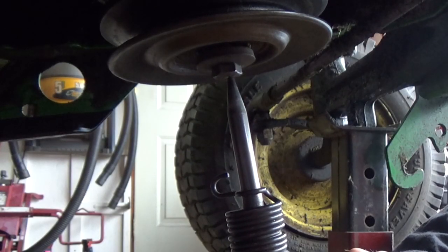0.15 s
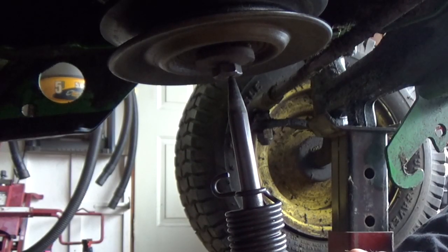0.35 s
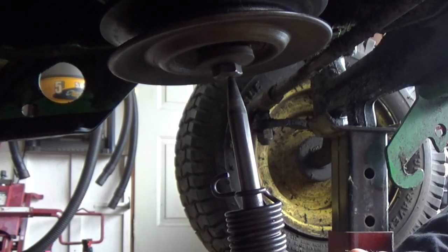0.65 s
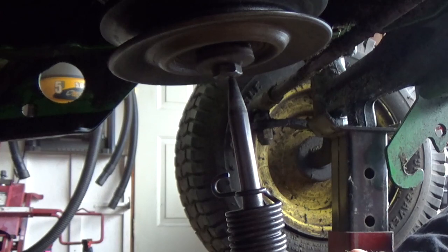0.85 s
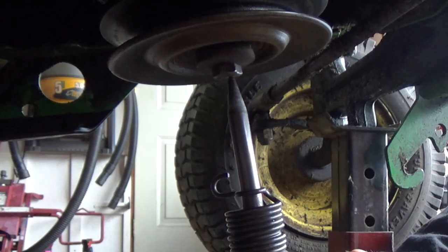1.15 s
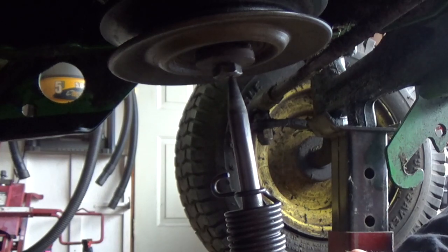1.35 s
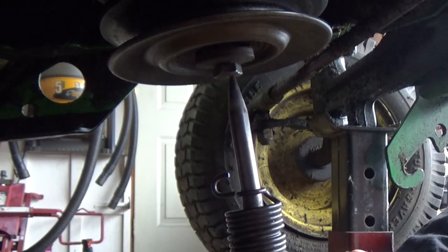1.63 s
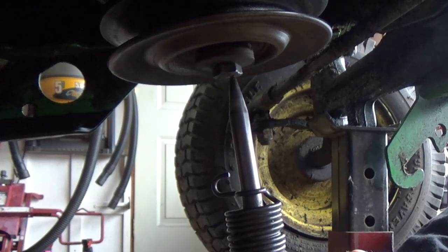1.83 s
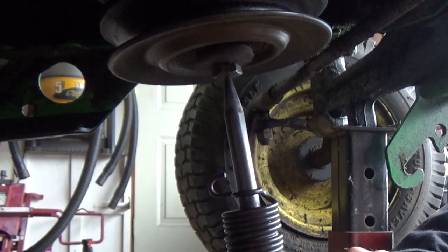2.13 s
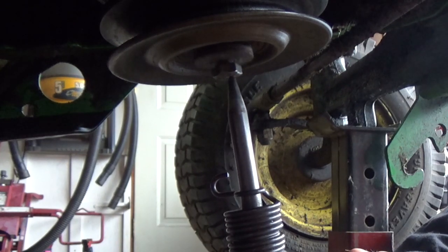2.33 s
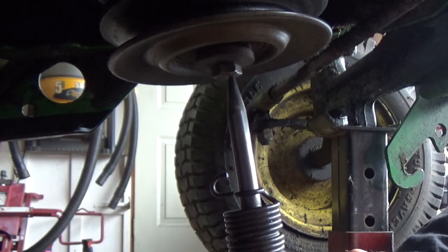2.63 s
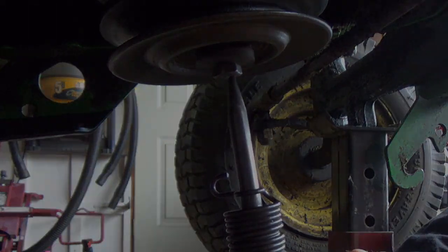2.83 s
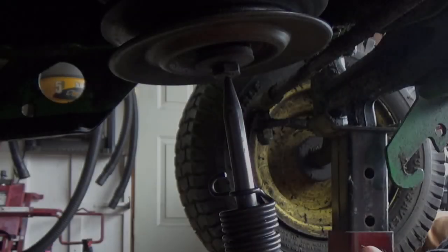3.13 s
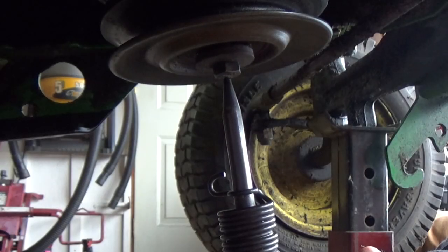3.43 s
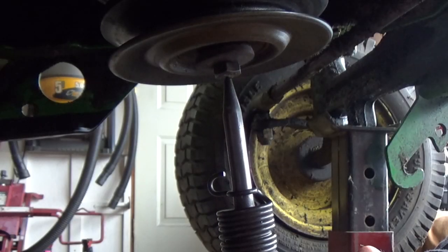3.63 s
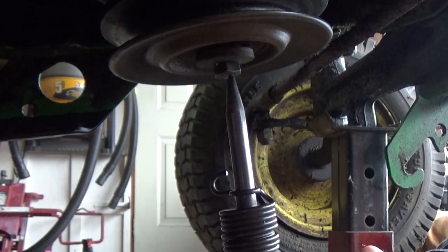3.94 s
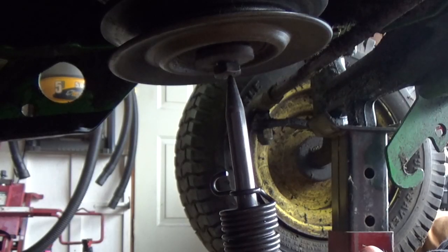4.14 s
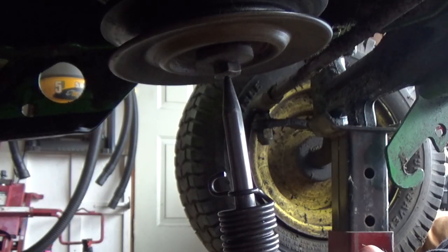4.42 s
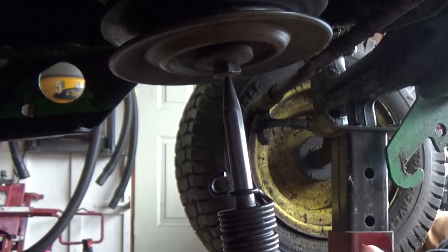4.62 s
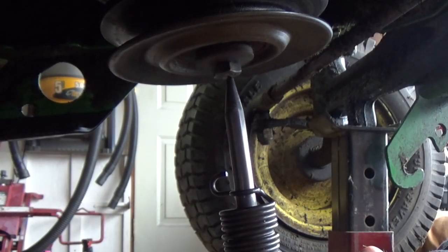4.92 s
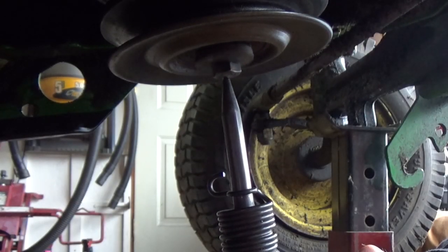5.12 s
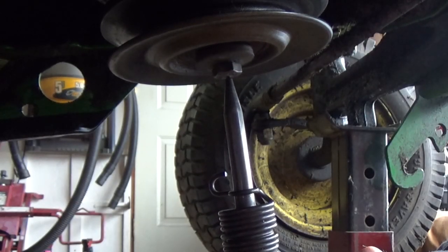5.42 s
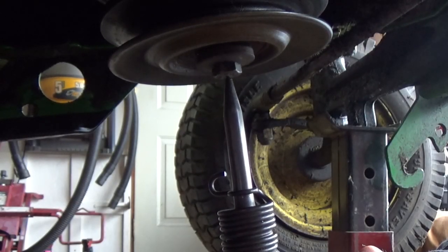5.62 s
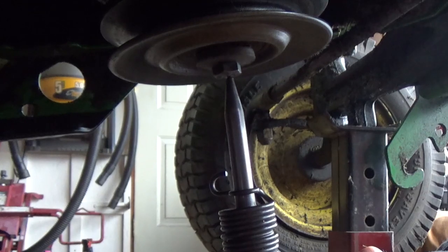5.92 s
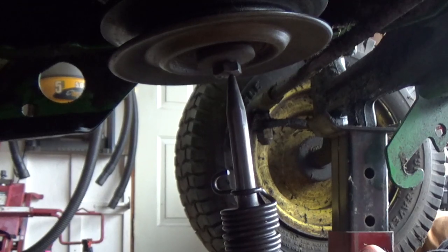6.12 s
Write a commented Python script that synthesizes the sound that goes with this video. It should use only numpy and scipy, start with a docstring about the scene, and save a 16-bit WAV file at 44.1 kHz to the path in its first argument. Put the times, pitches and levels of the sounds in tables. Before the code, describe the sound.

A pneumatic hammer runs without pause, heard close up under a machine. Its blows come about forty to fifty a second, each a hard tick and crack with ringing bit and clanging pulley, over puffing, hissing air. Halfway it drops to just over thirty blows a second with heavier exhaust thumps and less high ringing, then slowly quickens. The workshop adds a short, dense reverberation.

```python
"""Air hammer on a seized clutch

In a workshop, close by, a pneumatic hammer drives its punch bit against the bolt of a seized clutch.
The piston strikes about 25-58 times a second: each blow cracks and rings the bit and the clutch.
Each stroke vents puffs of air that boom, buzz and hiss; the workshop answers with a short reverberation.
Halfway through, the bit takes a new seat and the hammer runs slower, with a heavier exhaust.
"""
import sys
import numpy as np
from scipy import signal
from scipy.fft import rfft, irfft
from scipy.io import wavfile
from scipy.ndimage import uniform_filter1d

SR = 44100
rng = np.random.default_rng(int(sys.argv[2]) if len(sys.argv) > 2 else 0)


def transcribe(u):
    """Save the signal u as a 16-bit wav file named by the first command-line argument.

    u: samples, shape (n,) or (channels, n), limited to [-1, 1]; the rate is SR.
    q: integer samples, one column per channel.
    """
    v = np.clip(np.atleast_2d(u).T, -1, 1)
    q = np.round(v * 32767).astype(np.int16)
    wavfile.write(sys.argv[1], SR, q)


N = 276330
TIME = np.arange(N) / SR
RESEAT_S = 3.04
CUTOFF_HZ = 15850

# Levels within a mode, order or spectrum table are relative to one another.
# piston speed in the first seat: (time [s], rate [blows/s])
FIRST_SPEED = [(0.0, 39.39), (0.1, 57.98), (0.199, 34.12), (0.299, 25.7), (0.399, 38.47), (0.498, 43.71),
               (0.748, 37.37), (0.797, 43.9), (0.847, 40.84), (0.947, 47.24), (1.146, 38.87),
               (1.196, 48.99), (1.246, 41.02), (1.346, 45.0), (1.495, 45.9), (1.545, 43.53), (1.595, 47.97),
               (1.744, 40.08), (1.794, 45.78), (2.143, 46.36), (2.193, 42.46), (2.342, 39.99),
               (2.392, 51.41), (2.691, 52.38), (2.791, 47.03), (2.841, 52.61), (2.89, 46.79), (3.04, 55.09)]
# piston speed in the second seat: (time [s], rate [blows/s])
SECOND_SPEED = [(3.04, 32.36), (3.411, 31.1), (3.57, 33.13), (3.781, 32.26), (4.523, 35.21), (4.576, 34.71),
                (4.946, 37.03), (4.999, 33.77), (5.211, 38.7), (5.317, 34.23), (5.37, 42.39),
                (5.582, 36.65), (5.635, 41.94), (5.74, 38.66), (5.899, 40.6), (6.111, 40.55), (6.27, 43.92)]
# each seat starts on a full air line: (piston position [turns], blows [dB], clutch [dB], exhaust [dB],
# sag of the air [dB], time constant of the sag [s], return puff after the blow [turns], hiss over boom [dB])
SEAT_SETTINGS = [(0.448, -25, -33, -33, 5, 0.68, 0.58, 3), (0.175, -27, -33, -28, 14, 2.55, 0.515, 3)]
# how hard the bit is pushed on the bolt, for rattle and hiss: (time [s], level [dB])
PUSH_CURVE = [(0, -1), (.17, 1), (.22, 0.5), (.28, -11), (.35, -13), (.41, -1.5), (3, -2), (3.06, 0),
              (4.2, -0.5), (6.27, -2.5)]
# the operator leans on the hammer (+) or eases off (-): (time [s], half length [s], level at the clutch [dB])
OPERATOR_LEANS = [(0.055, 0.12, 1.7), (0.277, 0.11, -2.5), (1.478, 0.037, 1), (2.058, 0.21, 1.5),
                  (2.26, 0.09, -3), (2.98, 0.21, 1), (4.346, 0.062, 1), (4.733, 0.2, -2.0),
                  (5.24, 0.15, 0.7), (5.73, 0.022, -3)]
# shares of the air's sag, and of the operator's lean, that each level follows
BLOW_SAG_SHARE, CLUTCH_SAG_SHARE = 0.014, 0.21
BLOW_LEAN_SHARE, AIR_LEAN_SHARE = 0.95, 0.47
# blows that bite harder (+) or skid (-): (time [s], level [dB])
ACCENTED_BLOWS = [(0.013, -1.5), (0.202, -2.8), (1.017, 2), (1.184, 2.5), (1.364, -2), (1.476, 1.5),
                  (2.074, 0.5), (2.395, 4), (2.882, 1.5), (3.252, -7), (3.569, -2), (3.751, -4),
                  (3.781, 0.5), (3.965, 1.7), (4.322, -2), (4.751, 2), (5.504, 2.5), (6.156, -1)]
# crack of steel on steel: (frequency [Hz], level [dB per Hz])
CRACK_SPECTRUM = [(1500, -11), (3300, 3.5), (5000, 4.5), (6800, 11.5), (8500, 11), (11000, 15),
                  (12800, -5.5), (14500, 5.5), (15700, 3)]
# steel bit and bolt: (frequency [Hz], width [Hz], level in first seat [dB], level in second seat [dB])
BIT_MODES = [(5254, 110, -41.5, -41.5), (5740, 400, -38, -49), (5750, 50, -49, -46.5),
             (6320, 74, -44.5, -46), (6430, 120, -68, -46), (6660, 88, -45.5, -51), (6920, 96, -37.5, -38),
             (7430, 200, -44, -44), (7780, 50, -43.5, -39), (9070, 200, -38.5, -55),
             (9640, 130, -34.5, -46), (10045, 300, -37, -45), (10630, 55, -57, -45),
             (11170, 55, -37, -38.5), (11590, 210, -38.5, -38), (12730, 810, -39, -38),
             (14400, 400, -47, -47)]
# tick of the very first contact: (frequency [Hz], level [dB per Hz])
TICK_SPECTRUM = [(1000, -23), (2500, -10), (5500, -4), (8500, 0), (12000, -1.5), (14200, 0), (15700, 0)]
# the bit's long high ring, split into three close modes:
# (frequency [Hz], width [Hz], level in first seat [dB], level in second seat [dB])
HIGH_RING_MODES = [(10010, 43, -0.5, -5), (10110, 59, -4, 2), (10170, 33, 10, 1)]
# blows that land squarely and make the high ring flare: (time [s], ring level before its trim [dB])
SQUARE_HITS = [(0.036, -29.4), (0.077, -30.8), (0.094, -28), (0.517, -26.3), (0.588, -29.6), (0.714, -31),
               (0.789, -29.5), (0.837, -31.0), (1.342, -29.6), (1.364, -28), (1.387, -29), (1.409, -31),
               (1.565, -30.6), (1.649, -29.5), (1.673, -33), (1.719, -31), (1.768, -28), (1.943, -34),
               (2.03, -30), (2.118, -28), (2.137, -36), (2.374, -33), (2.435, -30), (2.492, -31),
               (2.549, -30.5), (2.589, -30), (2.665, -31.5), (2.685, -32), (2.804, -30.4), (2.882, -30),
               (2.985, -31.0), (3.005, -36), (3.023, -32), (3.599, -35), (3.72, -36), (3.781, -35),
               (3.874, -32), (3.904, -36), (4.147, -36), (4.941, -33), (5.166, -32), (5.22, -37),
               (5.732, -31.5), (5.76, -35), (5.785, -35), (5.933, -33), (6.057, -37)]
# clutch pulley and chassis: (frequency [Hz], width [Hz], level in first seat [dB], level in second seat [dB])
CLUTCH_MODES = [(495.4, 65, -47.5, -47), (628, 33, -44.5, -48.5), (649.2, 34, -46, -48.5),
                (779, 52, -48, -47), (896, 160, -49, -47.5), (1039.7, 16.5, -46.5, -44),
                (1198, 37, -43.5, -46.5), (1404, 63, -42.5, -42), (1511, 73, -47, -44),
                (1870, 42, -53, -52), (1855, 120, -46, -43), (2110, 196, -40.5, -39),
                (2292, 88, -50, -42.5), (2507, 100, -85, -46), (2630, 53, -49, -46), (2710, 170, -47, -39),
                (2850, 78, -46, -72), (3086, 180, -44, -75), (3208, 47, -51, -42), (3330, 170, -47.5, -37),
                (3450, 360, -42.5, -36), (3712, 81, -44, -47), (3840, 140, -40.5, -47),
                (3906, 33, -55, -45), (4145, 66, -47, -52.5), (4430, 74, -42.5, -43),
                (4527, 63, -43, -42.5), (4800, 240, -55, -47)]
# one band of the metal's sound grows louder (+) or softer (-) for a while:
# (time [s], half length [s], frequency [Hz], width [Hz], level [dB])
BAND_CHANGES = [(0.32, 0.09, 1500, 300, 5.5), (0.33, 0.055, 7200, 400, 6), (0.33, 0.055, 11500, 600, 3),
                (0.303, 0.083, 2780, 900, -8), (1.15, 0.24, 6300, 400, 4.5), (1.468, 0.032, 3280, 700, 5),
                (1.95, 0.46, 3640, 300, 4), (2.1, 0.95, 784, 100, 3.5), (2.82, 0.4, 2020, 700, 4),
                (3.3, 0.16, 560, 250, 6), (3.35, 0.21, 3250, 300, 4.5), (3.55, 0.23, 11200, 450, 6.5),
                (3.85, 0.32, 7200, 600, 4), (4.1, 0.34, 1520, 90, 7), (4.384, 0.051, 3250, 700, 5),
                (4.65, 0.23, 10700, 180, 9), (5.048, 0.54, 820, 110, 7.5), (5.214, 0.18, 2860, 800, 3),
                (5.3, 0.24, 6630, 400, 6.5), (1.45, 0.65, 14200, 700, 1), (5.7, 0.5, 11300, 300, 1),
                (5.85, 0.9, 1030, 80, -3), (6.1, 0.6, 647, 50, 10.5)]
# boom of the hollow under the chassis: (frequency [Hz], level [dB per Hz])
HOLLOW_SPECTRUM = [(25, -32), (62, -24), (100, -5.5), (128, -0.5), (150, -3), (175, 1), (205, 4),
                   (232, 5.5), (255, 9.5), (285, 4), (320, 9), (360, -2.5), (420, -20.5), (540, -17),
                   (1000, -19.5), (4000, -52)]
# chuff of a heavy return puff: (frequency [Hz], level [dB per Hz])
CHUFF_SPECTRUM = [(30, -22.5), (80, -9.5), (160, -7.5), (250, -4.5), (325, -1.5), (420, -12.5), (520, -4.5),
                  (575, -4), (640, -5), (720, -14), (1100, -19), (3000, -35)]
# buzz of the exhaust port: (multiple of the blow rate, level in first seat [dB], level in second seat [dB])
PORT_ORDERS = [(2, 3, 3), (3, 2, -3), (4, 3.5, 6), (5, -2.5, -4), (6, -1, 3), (7, -0.5, -4), (8, -5, -0.5),
               (9, -4, 0.5), (10, -1.5, -2), (11, 0, -3)]
# rush of the exhaust air: (frequency [Hz], level [dB per Hz])
RUSH_SPECTRUM = [(25, -20), (60, -19), (130, -14), (330, 5), (430, -14.5), (540, -6), (900, -0.5),
                 (1700, -3), (2200, -4.5), (3300, -4), (4700, -4), (7500, 1.5), (11000, 2), (15000, -18.5)]


def run_in_seat(start_s, speed, seat):
    """The piston turns and the air sags: turns, vent position, then dB of blows, clutch, boom and hiss."""
    position, blow_db, clutch_db, air_db, sag_db, sag_s, vent_at, hiss_db = seat
    rate, = in_time(speed)
    turns = position + np.cumsum(rate * (TIME >= start_s)) / SR
    lost_db = sag_db * (1 - np.exp(-np.maximum(TIME - start_s, 0) / sag_s))
    lean_db = lean()
    boom_db = air_db - lost_db + AIR_LEAN_SHARE * lean_db
    return np.array([turns, np.full(N, vent_at),
                     blow_db - BLOW_SAG_SHARE * lost_db + BLOW_LEAN_SHARE * lean_db,
                     clutch_db - CLUTCH_SAG_SHARE * lost_db + lean_db,
                     boom_db, boom_db + hiss_db])


def lean():
    """Each lean on the hammer swells and fades as a bell curve, in dB."""
    return sum(db * bell(s, half_s) for s, half_s, db in OPERATOR_LEANS)


def strokes(turns, spread_db, jitter_s):
    """One click each time the piston completes a turn, a little uneven in time and strength."""
    at = np.flatnonzero(np.diff(np.floor(turns)) > 0)
    late, strong = rng.standard_normal((len(at), 2)).T
    landing = at + (late * jitter_s * SR).astype(int)
    clicks = np.zeros(N)
    clicks[np.clip(landing, 0, N - 1)] = from_db(strong * spread_db)
    return clicks


def contact(blows, push, crush_db, crush_s, rattle_db, rattle_s):
    """Force at the tip: the blow, a brief crush of rough steel, then the bit chattering on the bolt."""
    crush = from_db(crush_db) * burst(blows, crush_s)
    rattle = from_db(rattle_db) * push * burst(blows, rattle_s)
    return blows + crush + rattle


def steel(blows, push):
    """Steel meets steel: a tick, a bright broadband crack, and the short modal ring of the bit."""
    crack_force = contact(blows, push, crush_db=1, crush_s=0.0007, rattle_db=-2.5, rattle_s=0.007)
    crack = stroke_by_stroke(colour(crack_force, CRACK_SPECTRUM), blows)
    ring_force = contact(blows, push, crush_db=-0.5, crush_s=0.0016, rattle_db=3, rattle_s=0.0098)
    ring_force = scatter(ring_force, lags_s=(.0004, .0009), echo=0.62)
    ring = stroke_by_stroke(resonate(ring_force, BIT_MODES), blows)
    sound = from_db(-4.5) * crack + from_db(-5.5) * ring
    edge = tick(blows, tick_db=-9, decay_s=0.0007)
    return edge + scatter(sound, lags_s=(.00009, .00015, .00023), echo=0.8)


def tick(blows, tick_db, decay_s):
    """Hardened steel meets the bolt with a hard, bright tick, ahead of the ring."""
    return from_db(tick_db) * stroke_by_stroke(colour(burst(blows, decay_s), TICK_SPECTRUM), blows)


def high_ring(blows, blow_db, glancing_db, spread_db, square_db):
    """Most blows glance and ring weakly; a square one makes the bit's long high modes flare."""
    chance = rng.standard_normal(N)[np.cumsum(blows != 0)]  # one draw per stroke
    level_db = mark_strokes(blows, blow_db + glancing_db + spread_db * chance, SQUARE_HITS)
    hits = blows * from_db(level_db)
    force = hits + from_db(-2) * burst(hits, decay_s=0.01)
    return from_db(level_db + square_db) * stroke_by_stroke(resonate(force, HIGH_RING_MODES), blows)


def clutch(blows, push):
    """The blows drive the modes of the pulley and the chassis, which clang under the bolt."""
    force = contact(blows, push, crush_db=-3.5, crush_s=0.001, rattle_db=-4.0, rattle_s=0.043)
    spread_force = scatter(force, lags_s=(.0005, .0009), echo=0.51)
    return from_db(-1.5) * stroke_by_stroke(resonate(spread_force, CLUTCH_MODES), blows)


def change_bands(metal):
    """One band of the metal's sound after another grows louder or softer for a while."""
    for s, half_s, hz, width_hz, db in BAND_CHANGES:
        band = signal.lfilter(*signal.iirpeak(hz, hz / width_hz, fs=SR), metal)
        metal = metal + (from_db(db * bell(s, half_s)) - 1) * band
    return metal


def exhaust(blows, vents, vent_db, decay_s):
    """Two turbulent puffs a turn, at the blow and on the return, rumble in the hollow under the chassis."""
    puffs = burst(from_db(vent_db) * vents + blows, decay_s)
    return stroke_by_stroke(colour(puffs, HOLLOW_SPECTRUM), blows)


def chuff(vents, delay_s, decay_s):
    """Each return puff breaks up, a moment late, into a short, rough thump of turbulence."""
    late = np.interp(TIME - delay_s, TIME, vents)
    return stroke_by_stroke(colour(burst(late, decay_s), CHUFF_SPECTRUM), vents)


def buzz(turns, smear):
    """The port opens alike on every turn: a low buzz in the hollow, order k trailing by k * smear turns."""
    first = TIME < RESEAT_S
    flow = np.zeros(N)
    for order, first_db, second_db in PORT_ORDERS:
        level = np.where(first, from_db(first_db), from_db(second_db))
        flow += level * np.cos(2 * np.pi * order * (turns - smear * order))
    return colour(flow, HOLLOW_SPECTRUM)


def rush(turns, vent_at, forward):
    """Turbulent air hisses twice a turn: a spit after the blow, a long gust on the return, over a leak."""
    gust_and_leak = swell(turns - vent_at, centre=0.2, sharpness=1.1) + .45
    flow = gust_and_leak + forward * swell(turns, centre=0.13, sharpness=18)
    port = 1 - .85 * swell(turns, centre=.94, sharpness=12)  # nearly shut just before the blow
    return even(colour(flow * port * rng.standard_normal(N), RUSH_SPECTRUM))


def workshop(x, wet_db, t60_s, treble_t60_s, gap_s):
    """Dense reflections follow the direct sound; their treble dies sooner."""
    t = TIME[:SR // 2]
    white = rng.standard_normal(len(t))
    dull = signal.sosfilt(signal.butter(1, 4000, fs=SR, output="sos"), white)
    treble = white - dull
    tail = dull * from_db(-60 * t / t60_s) + treble * from_db(-60 * t / treble_t60_s)
    tail = tail * (t > gap_s)
    wet = signal.fftconvolve(x, tail / np.sqrt(np.sum(tail ** 2)))[:N]
    return (x + from_db(wet_db) * wet) / np.hypot(1, from_db(wet_db))


def from_db(db):
    """Decibels to gain."""
    return 10 ** (np.asarray(db) / 20)


def in_time(rows):
    """The columns of a curve table at every sample."""
    s, *columns = np.transpose(rows)
    return [np.interp(TIME, s, c) for c in columns]


def bell(s, half_s):
    """A smooth rise and fall around a moment."""
    return np.exp(-((TIME - s) / half_s) ** 2)


def swell(turns, centre, sharpness):
    """A smooth bump once a turn, centred on the given share of it."""
    return np.exp(sharpness * (np.cos(2 * np.pi * (turns - centre)) - 1))


def fade(clicks, decay_s):
    """Each click becomes a step that dies away."""
    return signal.lfilter([1], [1, -np.exp(-1 / (decay_s * SR))], clicks + 1e-18)


def burst(clicks, decay_s):
    """Each click becomes a dying burst of noise of the same energy on average."""
    return fade(clicks, decay_s) * rng.standard_normal(N) * np.sqrt(2 / (decay_s * SR))


def colour(x, spectrum):
    """Causal (minimum-phase) filter with the given spectrum."""
    hz, db = np.transpose(spectrum)
    size = 4096
    grid = np.maximum(np.arange(size // 2 + 1) * SR / size, 1)
    grid_db = np.interp(np.log(grid), np.log(hz), db)
    cepstrum = irfft(np.log(from_db(grid_db)))
    # folding the cepstrum onto positive time gives minimum phase
    cepstrum[1:size // 2] *= 2
    cepstrum[size // 2 + 1:] = 0
    return signal.fftconvolve(x, irfft(np.exp(rfft(cepstrum))))[:N]


def resonate(force, modes):
    """Parallel modes; how strongly each is driven depends on the seat of the bit."""
    out = np.zeros(N)
    for k, (hz, width, first_db, second_db) in enumerate(modes):
        r = np.exp(-np.pi * width / SR)
        drive = force * np.where(TIME < RESEAT_S, from_db(first_db), from_db(second_db))
        poles = [1, -2 * r * np.cos(2 * np.pi * hz / SR), r * r]
        mode = np.sqrt(1 - r) * signal.lfilter([1, 0, -1], poles, drive + 1e-18)
        out += (-1) ** k * mode  # neighbours alternate in sign
    return out


def scatter(x, lags_s, echo):
    """Waves run to and fro in a body: all-pass echoes spread each blow out in time."""
    for lag_s in lags_s:
        gap = np.zeros(max(int(lag_s * SR), 1))
        x = signal.lfilter(np.r_[-echo, gap, 1], np.r_[1, gap, -echo], x + 1e-18)
    return x


def stroke_by_stroke(x, blows):
    """The piston delivers the same power in every stroke: rms close to 1 from each blow to the next."""
    stroke = np.cumsum(blows != 0)
    power = np.bincount(stroke, x * x) / np.maximum(np.bincount(stroke), 1)
    return x / np.sqrt(power + 1e-3 * power.mean())[stroke]


def mark_strokes(blows, usual_db, rows):
    """A level in dB in which the strokes under way 6 ms after the listed moments have their own value."""
    stroke = np.cumsum(blows != 0)
    own = np.full(stroke[-1] + 1, np.nan)
    for s, db in rows:
        own[stroke[min(int((s + .006) * SR), N - 1)]] = db
    return np.where(np.isnan(own[stroke]), usual_db, own[stroke])


def even(x):
    """Hold the rms near 1 over a few strokes, leaving each stroke its shape."""
    power = uniform_filter1d(uniform_filter1d(x * x, size=4400), size=4400)
    return x / np.sqrt(np.maximum(power, 1e-20))


def scene():
    """The piston times the blows and, about half a turn later, the return puffs."""
    first = run_in_seat(0, FIRST_SPEED, SEAT_SETTINGS[0])
    second = run_in_seat(RESEAT_S, SECOND_SPEED, SEAT_SETTINGS[1])
    turns, vent_at, blow_db, clutch_db, air_db, hiss_db = np.where(TIME < RESEAT_S, first, second)
    air_db = np.interp(TIME - 0.01, TIME, air_db)  # the exhaust follows a moment later
    push = from_db(in_time(PUSH_CURVE)[0])
    blows = strokes(turns, spread_db=1.0, jitter_s=.00006)
    vents = strokes(turns - vent_at, spread_db=4.0, jitter_s=0.00028)

    bit = from_db(blow_db + mark_strokes(blows, 0, ACCENTED_BLOWS)) * steel(blows, push)
    metal = change_bands(bit + from_db(clutch_db) * clutch(blows, push))
    ring = high_ring(blows, blow_db, glancing_db=-14.5, spread_db=4.5, square_db=3)

    # the heavier the exhaust, the more the return puff outweighs the first
    heavy_db = air_db + 36.0
    vent_db = 0.44 * heavy_db + 0.5
    boom_level = from_db(air_db - 8.0 - 0.48 * heavy_db)
    boom = boom_level * exhaust(blows, vents, vent_db, decay_s=0.009)
    thumps = from_db(air_db - 11.5 + 0.7 * heavy_db) * chuff(vents, delay_s=.004, decay_s=0.011)
    smear = 0.042 - 0.03 * np.clip(heavy_db / 6, 0, 1)  # a heavy exhaust comes in tighter puffs
    drone = from_db(air_db - 12.8 + 0.08 * heavy_db) * buzz(turns - vent_at, smear)
    forward = 0.61 * from_db(-1.3 * heavy_db)
    hiss = from_db(hiss_db) * push ** 0.99 * rush(turns, vent_at, forward)

    direct = metal + ring + boom + thumps + hiss
    in_room = workshop(direct, wet_db=-8, t60_s=0.34, treble_t60_s=0.23, gap_s=0.0036)
    return drone[None] + in_room  # the drone stays dry; one microphone channel


def record(dry):
    """At the microphone channel a steep low-pass cuts the top."""
    return signal.sosfilt(signal.ellip(12, .1, 80, CUTOFF_HZ, fs=SR, output="sos"), dry)


dry = scene()
out = record(dry)
transcribe(out)
```